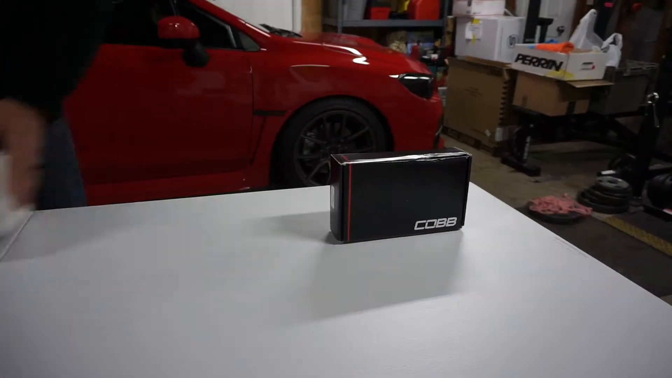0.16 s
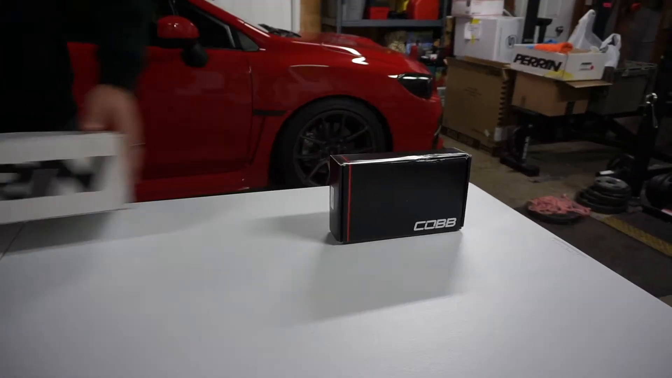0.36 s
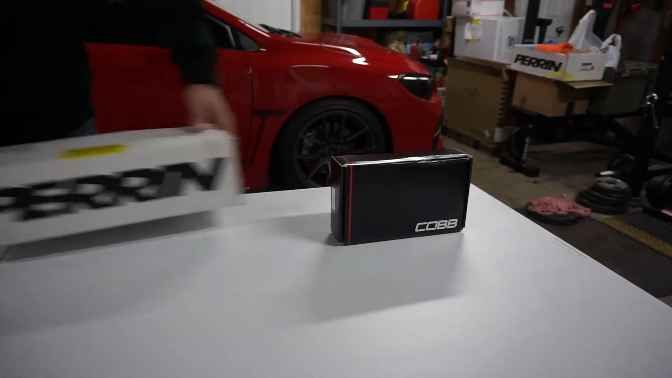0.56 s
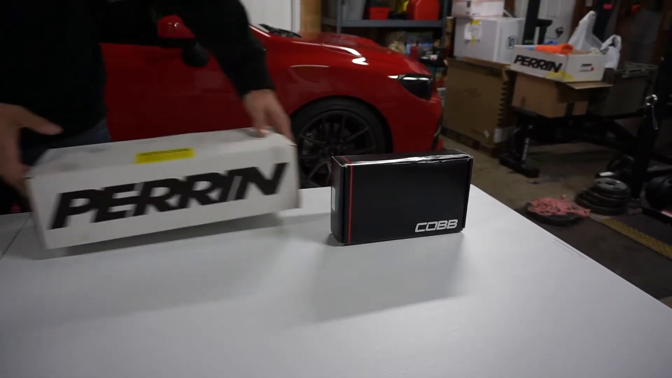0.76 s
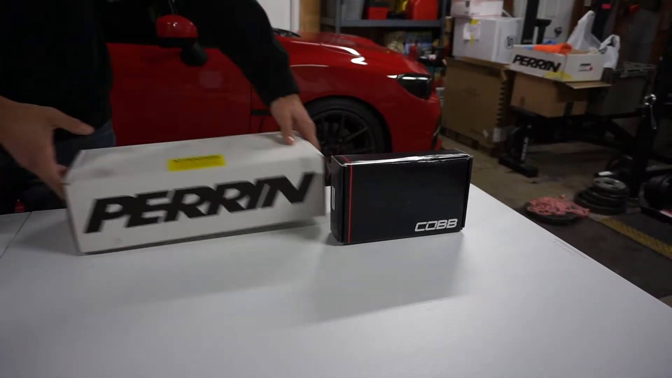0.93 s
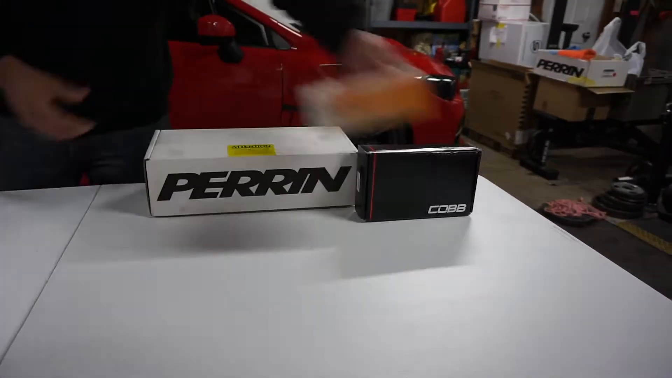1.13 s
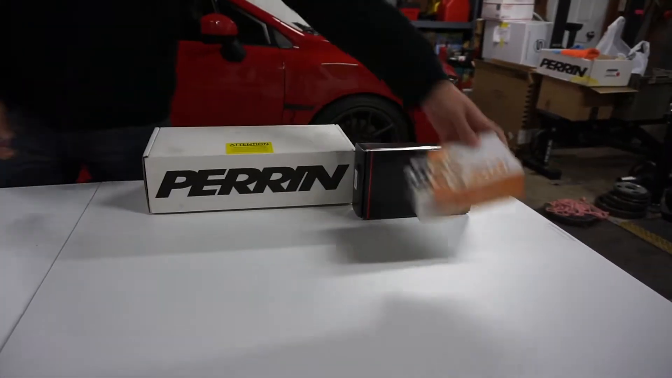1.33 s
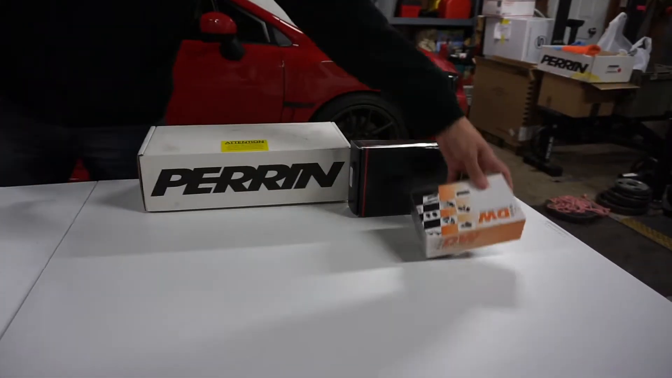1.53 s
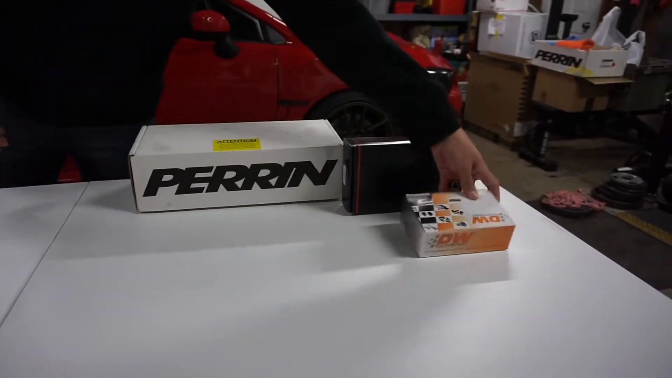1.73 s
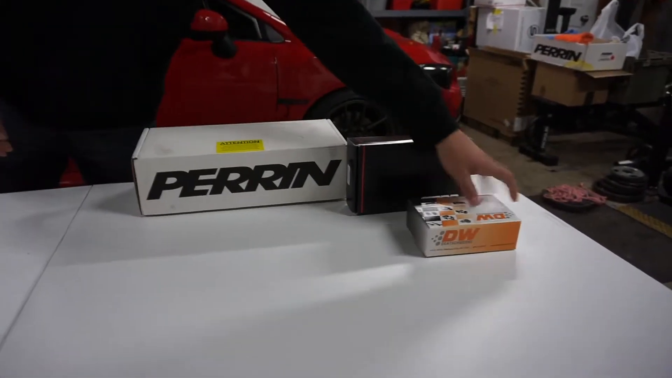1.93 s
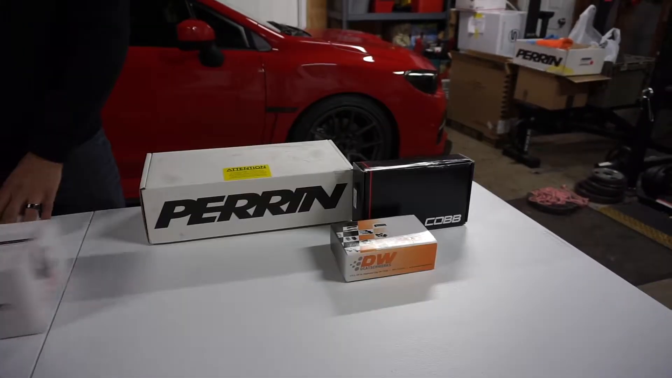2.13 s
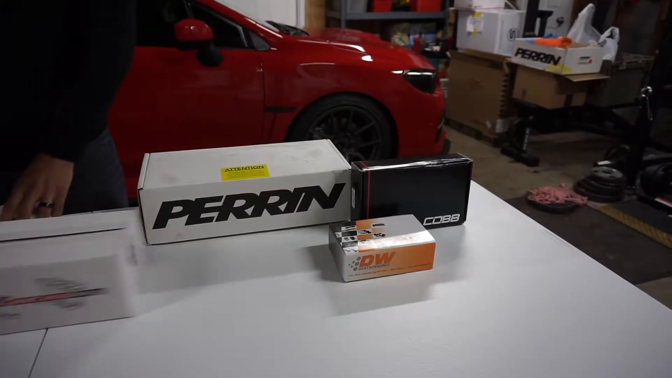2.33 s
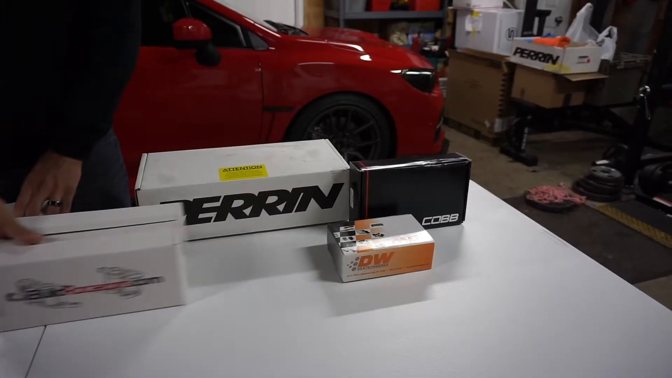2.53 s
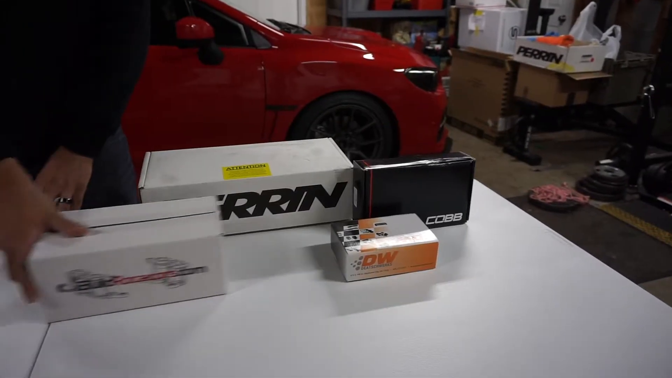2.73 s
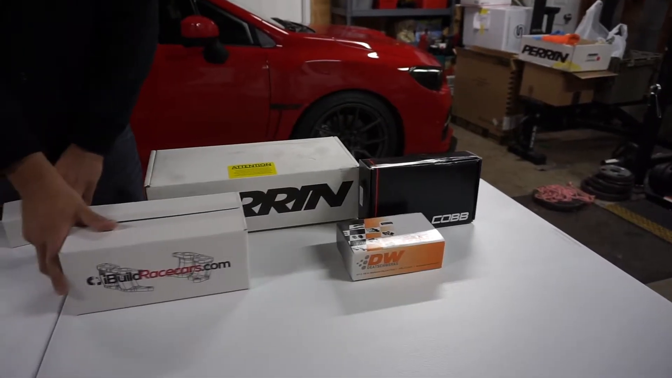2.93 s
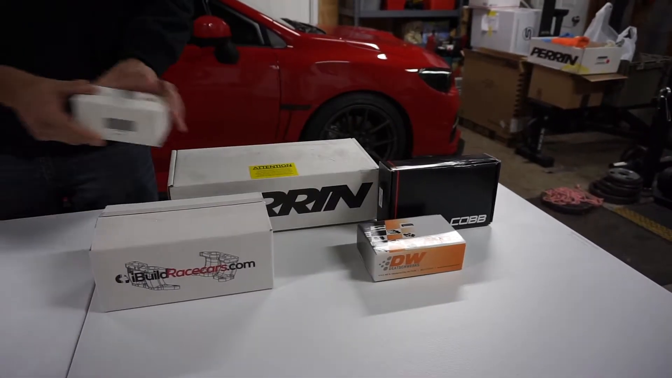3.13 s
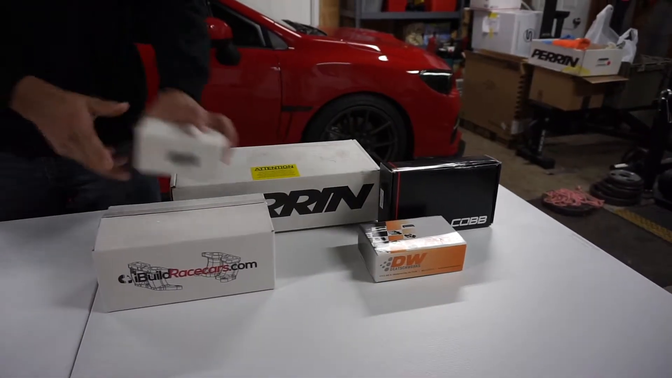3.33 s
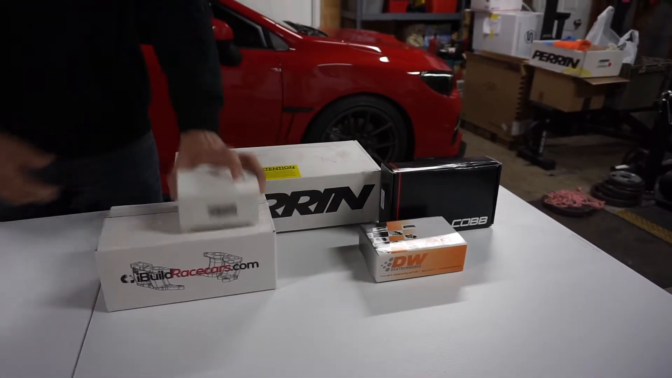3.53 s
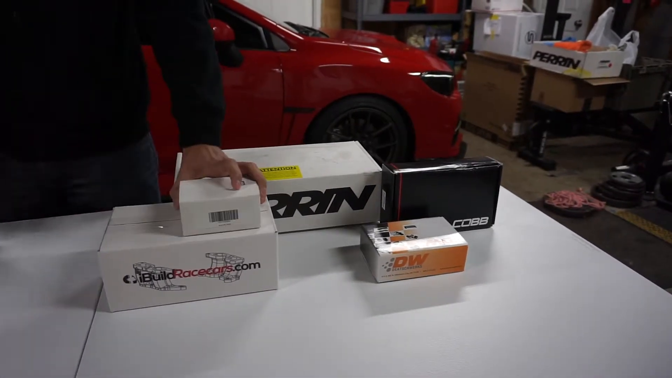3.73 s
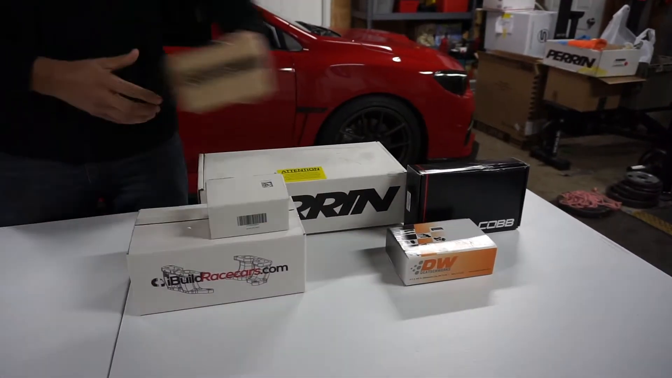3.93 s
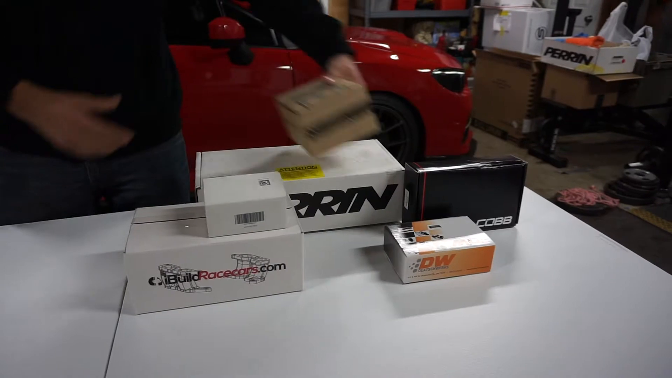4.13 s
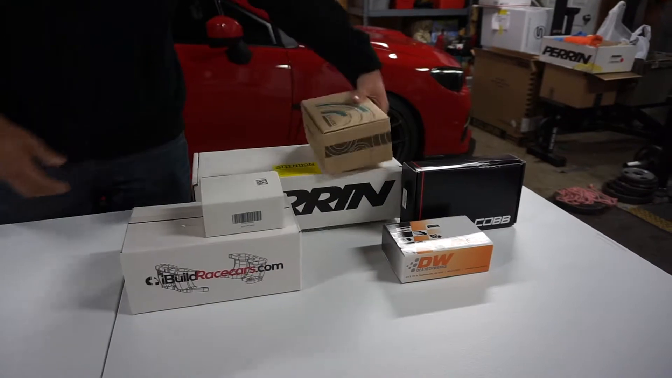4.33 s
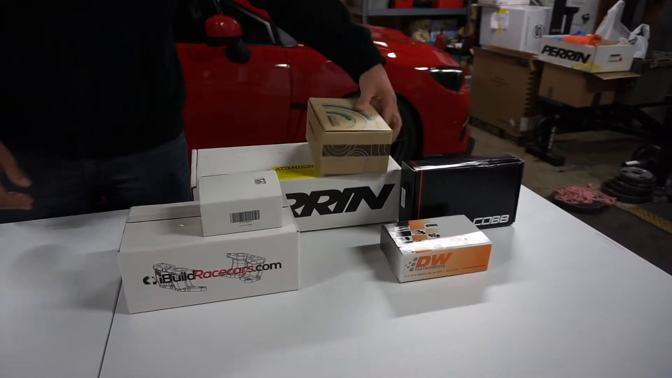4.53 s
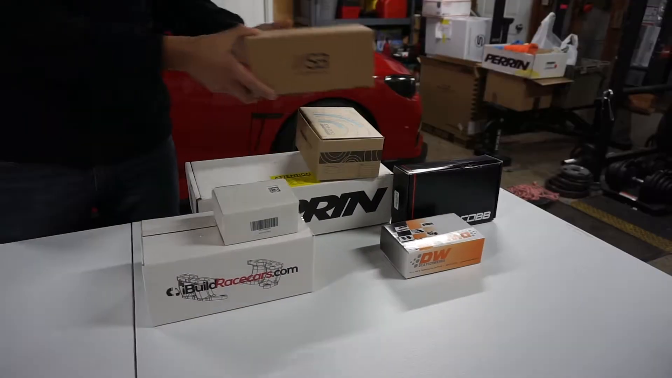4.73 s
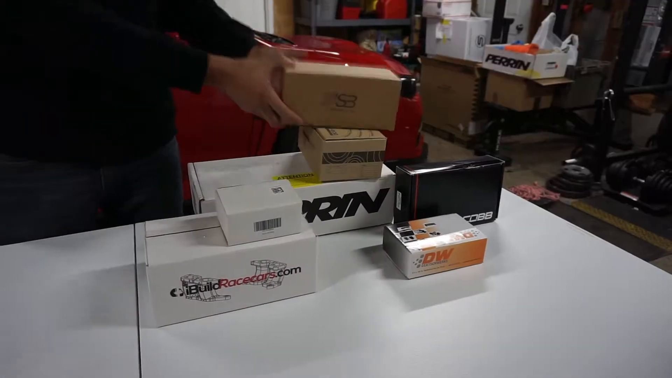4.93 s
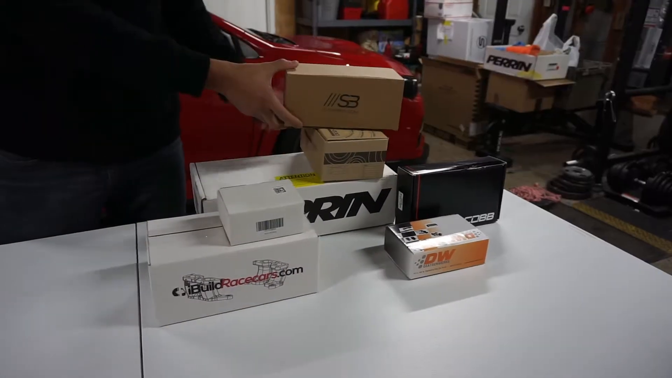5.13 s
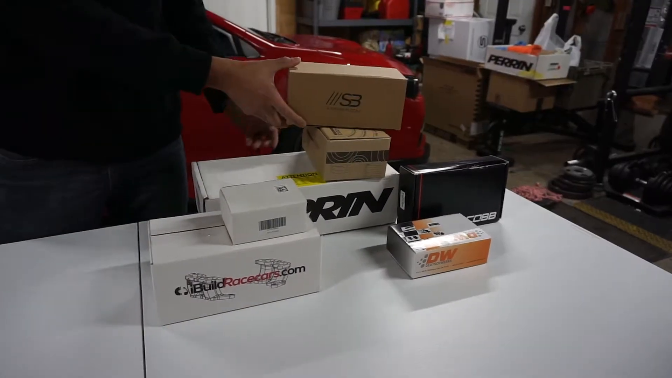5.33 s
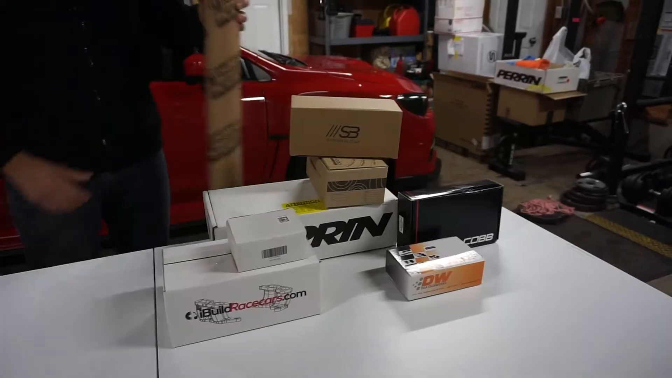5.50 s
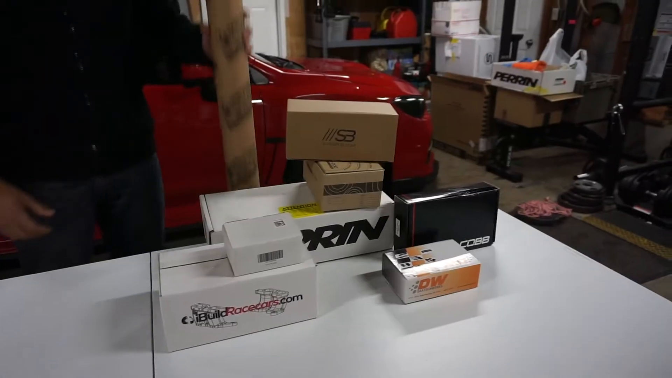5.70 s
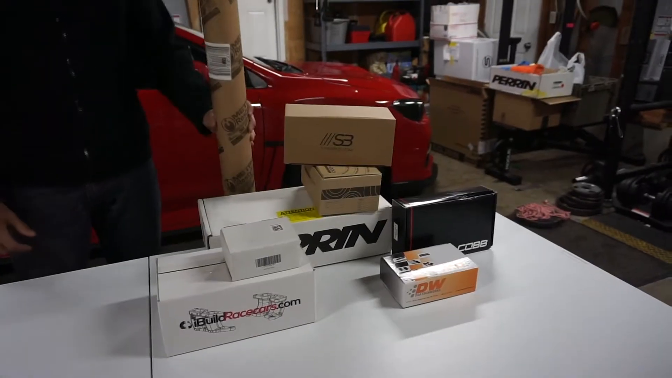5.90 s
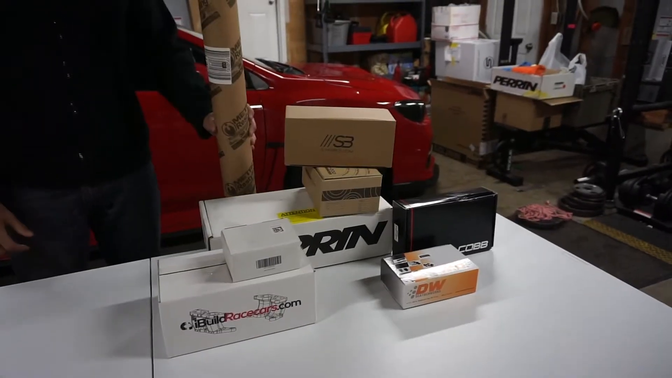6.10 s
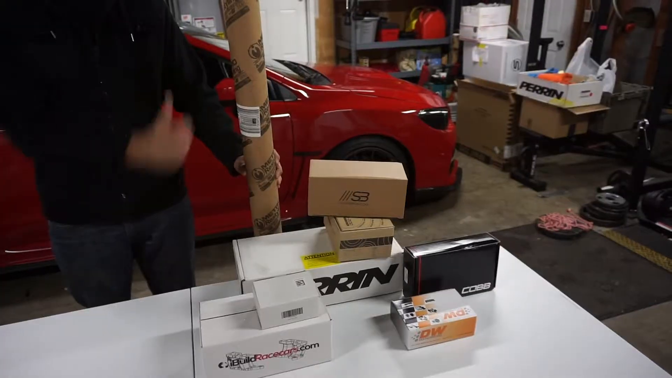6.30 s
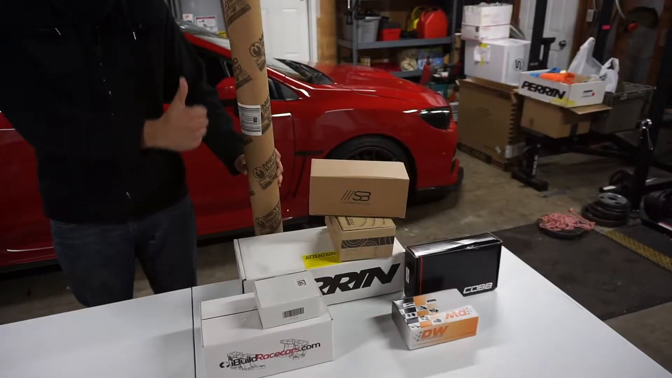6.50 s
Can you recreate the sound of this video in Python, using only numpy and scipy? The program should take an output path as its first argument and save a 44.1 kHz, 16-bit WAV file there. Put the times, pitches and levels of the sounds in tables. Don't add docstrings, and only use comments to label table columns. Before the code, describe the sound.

Close stereo pickup of boxes landing on a resonant table, each a woody thump and crisp card crack with brief room echo. Midway comes a rough half-second scrape with a falling shudder, ending in a bang. Light rustles and finger ticks separate further landings; a clustered stack knock and a hollow tube thud close it. Background hum and hiss jump at each cut.

```python
import sys
import numpy as np
from scipy import signal
from scipy.fft import rfft, irfft, next_fast_len
from scipy.io import wavfile

SR = 44100
rng = np.random.default_rng(int(sys.argv[2]) if len(sys.argv) > 2 else 0)


def generate_wav(signal):
    frames = np.transpose(np.atleast_2d(signal))
    scaled = np.clip(frames, -1, 1) * 32767
    pcm = np.round(scaled).astype(np.int16)
    wavfile.write(sys.argv[1], SR, pcm)


def to_linear_factor(level_db):
    exponent = np.asarray(level_db, float) / 20
    return 10 ** exponent


N = 289204
RUN_IN = SR // 4
TOP_HZ = 11400


# [f/Hz, level/dB, t60/s]
EDGE_MODES = [(943, -2, 0.0086), (2110, -0.5, 0.008), (2800, -14, 0.0046), (4750, -19, 0.015)]
# [f/Hz, level/dB per Hz]
CRACK_SPECTRUM = [(800, 3.5), (1300, -4.5), (2000, -4.5), (2900, -9), (3600, -18), (5000, -19),
                  (11500, -21.5)]


def blow(body, body_db, thump_s, peak_db, thump_db, thump_hz, box_hz, crack_db):
    t = np.arange(SR // 4) / SR
    thump = mode(t, thump_hz, thump_s, rise_s=0.00088)
    thump += 0.2 * mode(t, 1.36 * thump_hz, 0.35 * thump_s, rise_s=0.0073)
    box = mode(t, box_hz, t60=0.044, rise_s=0.001)
    box += 0.5 * mode(t, 1.46 * box_hz, t60=0.024, rise_s=0.0011)
    carried = [(hz, db + thump_db * (hz < 250), t60) for hz, db, t60 in body]
    under = struck(t, carried, spread_db=5.5, rise_s=0.0027)
    crack = struck(t, EDGE_MODES, spread_db=8.0, rise_s=0.0031)
    crack = crack + 0.5 * coloured(rng.standard_normal(len(t)), CRACK_SPECTRUM) * np.exp(-t / 0.0037)
    low = to_linear_factor(thump_db + 3.5) * thump + to_linear_factor(-3) * box
    return to_linear_factor(peak_db) * (low + to_linear_factor(body_db - 7.5) * under + to_linear_factor(crack_db + 8.0) * crack)


# [t/s, peak level/dB, thump against peak/dB, thump f/Hz, box f/Hz]
EDGE_LANDINGS = [(0.002, -21, -4.5, 200, 320), (0.087, -12, -26, 237, 510), (0.224, -34, -20, 116, 530),
                 (0.611, -30, -29, 186, 892), (1.017, -22, -10, 205, 355), (1.317, -39, -23, 103, 440),
                 (1.755, -12, -9.5, 365, 582), (2.793, -10, -6.5, 150, 321),
                 (2.827, -22.5, 6.5, 140.3, 337), (4.3029, -24.5, -3, 281, 327),
                 (4.381, -23.5, -5, 231, 285), (4.454, -19, -37, 291, 430), (4.539, -17, -11, 158, 383),
                 (4.554, -19, -13, 223, 604), (4.98, -14, -9, 190, 453), (4.99, -16.5, -4, 188, 332),
                 (5.016, -21.5, 7, 135, 318), (5.906, -12.5, -9.5, 179, 297), (5.924, -20, -9, 318, 320),
                 (5.954, -21, -1, 288, 350), (5.984, -25, -4, 288, 330)]
FLAT_LANDINGS = [(0.02, -14.5, -10.5, 129, 585), (0.132, -19, -38, 274, 570), (0.15, -24, -24, 91.5, 526),
                 (0.617, -29.5, -17, 91.5, 584), (0.981, -25, 0.5, 170, 312),
                 (0.992, -22.5, -0.5, 186, 610), (1.601, -15, -2.5, 155, 405), (1.64, -29.5, 0, 205, 422),
                 (1.828, -17, -8.5, 139, 340), (1.868, -29, -18, 146, 468), (2.807, -13, -15, 143, 532),
                 (3.587, -10, -12, 251, 265), (3.623, -11, -8.5, 176, 541), (3.678, -31, 0, 246, 320),
                 (4.63, -19.5, -6.5, 143, 542), (4.967, -21, -14, 102, 665), (5.004, -19.5, -22, 189, 1210),
                 (5.069, -20, -18, 146, 580), (5.092, -27.5, 5.5, 143, 426)]
FLAT_CRACK_DB = -21.5
# [f/Hz, level/dB, t60/s]
TABLE_MODES = [(58, -16, 0.11), (135, -5.5, 0.28), (212.7, 2, 0.2), (281.7, -14, 0.35), (373.8, -11, 0.2),
               (481, -8, 0.079), (635, -13, 0.12), (939, -10, 0.063), (1323, -25, 0.084)]
# [f/Hz, level/dB, t60/s]
TUBE_MODES = [(102, -2, 0.37), (205, -4, 0.49), (288, -3, 0.35), (330, -12, 0.37), (376, -5, 0.4),
              (780, 7.5, 0.041), (1270, -2, 0.1)]
TUBE_FROM_S, TUBE_DB = 5.9, 3


def landings(t, start, stop, table_db, thump_s, edge_db):
    out = np.zeros(len(t))
    blows = [(*b, edge_db) for b in EDGE_LANDINGS] + [(*b, FLAT_CRACK_DB) for b in FLAT_LANDINGS]
    for s, *row in blows:
        if start <= s < stop:
            body, body_db = (TUBE_MODES, TUBE_DB) if s > TUBE_FROM_S else (TABLE_MODES, table_db)
            add_at(out, t, s, -blow(body, body_db, thump_s, *row))
    return out


# [f/Hz, level/dB per Hz]
CARD_SPECTRUM = [(60, -37), (110, -10), (300, -4.5), (420, -7), (550, -4.5), (700, -10.5), (950, -10),
                 (1100, -13.5), (1300, -13), (1700, -19), (2400, -30.5), (4800, -88)]
# [f/Hz, level/dB per Hz]
RUMBLE_SPECTRUM = [(25, -15), (45, -3.5), (70, -1), (120, -3.5), (200, -6.5), (400, -42.5)]
# [f/Hz, level/dB per Hz]
GRIT_SPECTRUM = [(1200, -28), (2000, -7), (2400, -4.5), (2750, -6), (3050, -8), (3500, -10.5),
                 (4500, -14.5), (6000, -27)]
# [f/Hz, level/dB per Hz]
HISS_SPECTRUM = [(2060, -37), (3500, -10.5), (6490, 0), (9580, 2), (10600, 5), (11200, 6.5), (14600, -48),
                 (22000, -120)]


def rubbing(t, levels, lowest_hz):
    rumble_db, card_db, grit_db, hiss_db = levels
    grains = uneven_grains((2, len(t)), 2.47)
    card = high_pass(coloured(grains[0], CARD_SPECTRUM), lowest_hz)
    card *= to_linear_factor(card_db - 4.0 + 1.88 * drift(43, len(t)))
    rumble = to_linear_factor(rumble_db - 5.0) * coloured(grains[0], RUMBLE_SPECTRUM)
    grit = to_linear_factor(grit_db - 2 + 1.05 * drift(39, len(t))) * coloured(grains[1], GRIT_SPECTRUM)
    hiss = to_linear_factor(hiss_db + 0.5 + 0.54 * drift(36, len(t))) * coloured(grains[1], HISS_SPECTRUM)
    return rumble + card + grit + hiss


# [t/s, card level/dB, hold/s, card fall/dB per s, grit against card/dB]
SETTLING = [(0, -37.5, 0.12, 290, -14.5), (0.637, -55, 0.022, 600, -15), (0.984, -39.5, 0.043, 106, -7),
            (1.593, -44.5, 0.039, 90, -16), (1.755, -24.5, 0.042, 126, -13.5),
            (2.787, -24, 0.0083, 128, -9.5), (3.214, -47.5, .03, 16, -8), (3.583, -27.5, 0.008, 98, -19),
            (3.78, -48.5, 0.11, 297, -25), (4.299, -46.5, 0.14, 66, -11.5), (4.434, -39.5, 0.06, 100, -11),
            (4.534, -34.5, .01, 77, -12.5), (4.977, -25, 0.046, 108, -15), (5.477, -62, .03, 38, -17),
            (5.904, -22, 0.11, 97, -11.5)]
SETTLE_RISE_S, GRIT_FALL_DB_PER_S, HISS_FALL_DB_PER_S = 0.0014, 117, 151
RUMBLE_DB, RUMBLE_FOLLOWS = -38.5, 0.39
RUMBLE_RISE_S, RUMBLE_FALL_DB_PER_S = 0.03, 52
# [t/s, pressure as card level/dB, grittiness/dB, drag on the table legs/dB]
SLIDE_PATH = [
    (2.075, -27, -8.5, -51),
    (2.177, -29.5, -5.5, -35),
    (2.323, -30.5, -14.5, -42.5),
    (2.381, -31.5, -8.5, -30),
    (2.485, -35.5, -7.5, -36),
    (2.785, -39, -5.5, -34.5),
]
SLIDE_GRIT_DB, SLIDE_GRIT_FOLLOWS = 0.3, 1.27


def rub_levels(t, start, stop, handling, hiss_db, table_db):
    power = to_linear_factor(2 * np.array(handling))[:, None] * np.ones(len(t))
    for s, card_db, hold_s, fall, grit_db in SETTLING:
        if start <= s < stop:
            age, late = np.maximum(t - s, 0), np.maximum(t - s - hold_s, 0)
            rise = 1 - np.exp(-age / SETTLE_RISE_S)
            swell = 1 - np.exp(-age / RUMBLE_RISE_S)
            rumble_db = RUMBLE_DB + RUMBLE_FOLLOWS * (card_db + table_db + 38.5)
            power[0] += (swell * to_linear_factor(rumble_db - RUMBLE_FALL_DB_PER_S * late)) ** 2
            power[1] += (rise * to_linear_factor(card_db - fall * late)) ** 2
            power[2] += (rise * to_linear_factor(card_db + grit_db - GRIT_FALL_DB_PER_S * late)) ** 2
            power[3] += (rise * to_linear_factor(card_db + hiss_db - HISS_FALL_DB_PER_S * age)) ** 2
    if start <= SLIDE_PATH[0][0] < stop:
        pressure, gritty, drag = in_time(SLIDE_PATH, t)
        grit = pressure + SLIDE_GRIT_DB + SLIDE_GRIT_FOLLOWS * gritty
        slide = np.array([drag, pressure, grit, pressure + gritty])
        power += to_linear_factor(2 * slide) * (t < SLIDE_PATH[-1][0])
    return 10 * np.log10(power)


# [t/s, f/Hz, level/dB, second partial level/dB]
STICK_SLIP = [
    (2.19, 114, -38, -44),
    (2.225, 110.8, -25, -37),
    (2.3, 97.6, -28, -36.5),
    (2.33, 93.2, -29, -40),
    (2.36, 85.6, -30.5, -28),
    (2.41, 76.5, -29, -34),
    (2.435, 72.5, -40, -29.5),
    (2.49, 62.7, -55, -37),
    (2.52, 60.6, -59, -42),
]


def judder(t):
    hz, first_db, second_db = in_time(STICK_SLIP, t)
    turn = phase(hz * (1 + 0.025 * drift(23, len(t))))
    on = np.clip(np.minimum(t - STICK_SLIP[0][0], STICK_SLIP[-1][0] - t) / 0.025, 0, 1)
    wave = to_linear_factor(first_db) * np.sin(turn)
    wave += to_linear_factor(second_db) * (np.sin(2 * turn + 1.6) + 0.14 * np.sin(3 * turn))
    return np.sqrt(2) * on * to_linear_factor(0.5 + 0.81 * drift(34, len(t))) * wave


# [t/s, f/Hz, level/dB]
HOLLOW_PATH = [
    (2.07, 2495, -60),
    (2.18, 2016, -46),
    (2.32, 2510, -58),
    (2.385, 2452, -42),
    (2.45, 2610, -55),
    (2.51, 2700, -46.5),
    (2.62, 2840, -51),
    (2.78, 2700, -57),
]


def hollow(t):
    hz, db = in_time(HOLLOW_PATH, t)
    narrow = signal.butter(2, 260, fs=SR, output="sos")
    a, b = signal.sosfilt(narrow, uneven_grains((2, len(t)), 2.7))
    turn = phase(hz)
    on = (t > HOLLOW_PATH[0][0]) * (t < HOLLOW_PATH[-1][0])
    return on * to_linear_factor(db + 4.1 * drift(26, len(t))) * rms_one(a * np.cos(turn) + b * np.sin(turn))


# [t/s, peak level/dB, f/Hz, t60/s, left-right/dB]
PANEL_RINGS = [(0.611, -43, 607, .05, 2), (1.574, -48, 2400, .012, -5), (1.574, -46, 1100, .015, -3),
               (1.6, -34.5, 3030, 0.023, -8), (1.6, -42, 4570, .02, -5), (1.603, -38, 2300, .02, -9),
               (1.745, -40, 2800, .015, -5), (1.755, -8.5, 2800, 0.011, -11),
               (1.755, -19.5, 4000, 0.012, -4), (1.756, -14, 950, 0.024, -4), (1.755, -32, 7500, .012, -13),
               (1.755, -32, 9500, .012, -6), (1.826, -36, 9500, .02, -6), (2.793, -21, 2940, 0.017, -1),
               (3.154, -42, 9600, .015, 7), (3.161, -37, 870, .02, 3), (3.218, -35, 8890, .015, 7),
               (3.231, -32, 8900, .015, 7), (3.588, -19.5, 489, .07, 2), (3.588, -25, 1030, .06, 3),
               (3.589, -28, 830, 0.079, 0), (3.59, -31, 1300, .06, 3), (3.623, -19, 363, 0.11, -1),
               (3.623, -39, 2030, .02, 0), (3.624, -35, 1210, .04, 0), (4.946, -41, 1540, .03, -2),
               (4.953, -36, 1450, .03, -2), (4.96, -23, 1370, .03, -4), (4.981, -16.5, 3040, 0.012, -4),
               (4.992, -21, 2800, .015, 0), (5.004, -37, 3870, .02, 0), (5.438, -49, 1120, .07, -9),
               (5.497, -48, 1144, .07, -4), (6.21, -54, 1140, .09, -2), (6.38, -49, 2110, .025, 0),
               (6.381, -50, 1300, .015, 0), (6.433, -51, 1150, .04, -6), (6.47, -41, 2900, 0.011, 0),
               (6.47, -44, 1550, .015, 0),
               (0.02, -41, 603, 0.033, 0), (0.087, -30, 495, .05, 2), (0.087, -42, 2800, 0.011, 0),
              (0.132, -38, 592, 0.044, 0), (0.15, -34, 540, .04, 0), (0.185, -34, 570, .04, 0),
              (0.205, -34, 530, .04, 0), (0.372, -42, 380, .03, 0), (0.443, -44, 198, .05, 0),
              (0.565, -49, 450, .03, 0), (0.007, -36, 2300, 0.017, 0), (4.31, -30, 75.6, 0.28, -2),
              (4.532, -33, 4220, .015, -6), (4.64, -31, 150, 0.11, -1), (0.611, -43, 3140, .012, 6),
              (0.992, -41, 2460, 0.012, 2), (1.316, -46, 2500, .01, -4), (4.453, -31, 1820, 0.022, -4),
              (5.915, -21, 780, 0.046, 2), (5.925, -16, 325, 0.17, 0), (5.97, -23, 296, 0.17, 1),
              (6.04, -26, 330, 0.27, 2)]


def flaps(t, start, stop):
    out = np.zeros((2, len(t)))
    age = np.arange(SR // 8) / SR
    for s, peak_db, hz, t60, pan_db in PANEL_RINGS:
        if start <= s < stop:
            ring = mode(age, hz, max(t60, .003), rise_s=0.0011)
            add_at(out, t, s, to_linear_factor(peak_db) * ring * pan(pan_db))
    return out


# [t/s, peak level/dB, f/Hz, left-right/dB, click share/dB]
SMALL_TICKS = [(0.064, -39, 1340, -5, -1), (0.611, -33, 2160, 7, -29), (0.8102, -43.5, 1080, 8, 0.5),
               (1.0394, -31.5, 2520, 0.0, -5), (1.4433, -40.5, 2400, -8, -11.5),
               (1.475, -42.5, 2350, -11, -8), (1.8416, -33, 1550, -15, -9), (3.051, -42.5, 1040, 17, 6),
               (3.3022, -39, 5000, 12, 8), (3.3224, -40, 9400, 20, 7), (3.9037, -46.5, 3400, 12, 0),
               (4.4527, -28, 1210, -9, -9.5), (4.532, -30, 2200, -9, -9), (4.558, -23, 2170, -9, -23),
               (5.9038, -25, 1270, 0, -20), (6.4699, -38.5, 1180, 0.0, -9.5)]


def ticks(t, start, stop):
    out = np.zeros((2, len(t)))
    age = np.arange(SR // 20) / SR
    for s, peak_db, hz, pan_db, click_db in SMALL_TICKS:
        if start <= s < stop:
            ring = mode(age, min(hz, TOP_HZ), t60=0.013, rise_s=0.00019)
            click = np.diff(burst(age, 0.0036) + 1.6 * burst(age, 0.00034), prepend=0)
            add_at(out, t, s, to_linear_factor(peak_db - 2) * (ring + to_linear_factor(click_db) * click) * pan(pan_db))
    return out


# [t/s, length/s, level/dB, lowest f/Hz]
SLEEVE_RUSTLES = [(0.05, 0.071, -46.5, 2500), (1.574, 0.054, -51, 5000), (1.698, 0.072, -50, 6000),
                  (3.178, 0.073, -40, 6500), (3.197, 0.045, -46, 2000), (3.261, 0.096, -41, 2980),
                  (3.835, 0.05, -51, 4500), (3.89, 0.065, -49, 2500), (4.353, 0.15, -46, 2500),
                  (4.506, 0.059, -39.5, 2000), (4.993, 0.027, -38, 2500), (5.835, 0.18, -46.5, 4000)]


def rustle(t):
    out, white = np.zeros(len(t)), rms_one(uneven_grains(len(t), 3.4))
    for s, length_s, db, lowest_hz in SLEEVE_RUSTLES:
        if t[0] < s < t[-1]:
            swell = np.sin(np.pi * np.clip((t - s) / length_s, 0, 1)) ** 2
            out += to_linear_factor(db) * swell * high_pass(white, lowest_hz)
    return out


# [t/s, f/Hz, level/dB]
TUBE_SQUEAK = [
    (5.515, 1180, -80),
    (5.53, 1253, -59),
    (5.545, 1450, -62),
    (5.59, 1410, -67),
    (5.61, 1420, -78),
]


def squeak(t):
    hz, db = in_time(TUBE_SQUEAK, t)
    turn = phase(hz * (1 + .015 * drift(40, len(t))))
    on = (t > TUBE_SQUEAK[0][0]) * (t < TUBE_SQUEAK[-1][0])
    return on * to_linear_factor(db + 3.0 * drift(50, len(t))) * (np.sin(turn) + .15 * np.sin(2 * turn))


def take(start, stop, side, garage_db, box, handling, echo):
    table_db, lowest_hz, thump_s, edge_db, hiss_db = box
    first, last = round(start * SR) - RUN_IN, round(stop * SR)
    t = np.arange(first, first + next_fast_len(last - first + SR)) / SR
    rubs = rub_levels(t, start, stop, handling, hiss_db, table_db)
    dry = (rubbing(t, rubs, lowest_hz) + rustle(t) * (t > start)) * (t < stop)
    dry += landings(t, start, stop, table_db, thump_s, edge_db) + squeak(t) + hollow(t)
    snaps = ticks(t, start, stop) + flaps(t, start, stop)
    shake = judder(t)
    into_room = dry + to_linear_factor(-1.0) * shake + to_linear_factor(-2) * snaps.mean(axis=0)
    wet = to_linear_factor(garage_db) * rfft(echo, len(t)) * rfft(into_room)
    direct = rfft(dry + shake) * ports(len(t), side)
    heard = irfft((direct + wet) * port_cavity(len(t)), len(t)) + snaps
    return top_cut(high_pass(heard[:, :last - first], 42., order=3))[:, RUN_IN:]


def ports(size, side):
    hz, lean = np.arange(size // 2 + 1) * SR / size, np.array([[side / 2], [-side / 2]])
    return to_linear_factor(lean * 20.4 * hz / (hz + 2500)) * np.exp(2j * np.pi * hz * lean * .00009)


PORT_HZ, PORT_WIDTH_HZ, PORT_DB = 2640, 1000, 0.5


def port_cavity(size):
    f = np.arange(size // 2 + 1) * SR / size
    return 1 + (to_linear_factor(PORT_DB) - 1) / (1 + 1j * (f ** 2 - PORT_HZ ** 2) / (PORT_WIDTH_HZ * f + 1))


def top_cut(x):
    return signal.sosfilt(signal.cheby2(14, 40, TOP_HZ, fs=SR, output="sos"), x)


# [f/Hz, t60/s, level/dB]
GARAGE_DECAY = [(50, 0.3, 4), (150, 0.55, -6), (427, 0.58, 0.5), (1100, 0.5, 0), (2750, 0.54, 3),
                (7500, 0.46, 4)]


def garage():
    t = np.arange(SR) / SR
    echo = np.zeros((2, SR))
    for hz, band in diffuse_bands(SR):
        echo += band * to_linear_factor(at_hz(GARAGE_DECAY, hz, column=2) - 60 * t / at_hz(GARAGE_DECAY, hz))
    echo = echo * (1 - np.exp(-np.maximum(t - .004, 0) / 0.0012))
    return echo / np.sqrt(np.sum(echo ** 2) / 2)


# [f/Hz, level/dB per Hz]
DRONE_SPECTRUM = [(13, -36), (22, -10), (64, -15.5), (102, 1.5), (173, -28), (192, -8.5), (331, -18.5),
                  (368, -18.5), (688, -24.5), (763, -25.5), (1040, -29.5), (1460, -25.5), (1670, -41.5),
                  (1950, -30.5), (11200, -39.5), (14600, -78), (22000, -120)]
# [f/Hz, level/dB per Hz]
MURMUR_SPECTRUM = [(600, -16), (800, -2.5), (900, 2), (1050, -12.5), (1150, -0.5), (1250, -21), (1600, -31)]


def drone():
    layers = np.zeros((4, 2, N))
    for hz, band in diffuse_bands(N):
        part = int(hz > 400) + int(hz > 2000)
        sway_db = [2.2, 1.2, .4][part] * drift(7.7, N)
        layers[part] += band * to_linear_factor(at_hz(DRONE_SPECTRUM, hz) + sway_db)
    layers = to_linear_factor(-52.0) * layers / np.sqrt(np.mean(layers.sum(axis=0) ** 2))
    mid, side = [coloured(x, MURMUR_SPECTRUM) for x in rng.standard_normal((2, N))]
    layers[3] = to_linear_factor(2 * drift(4.2, N)) * (mid + 0.86 * side * [[1], [-1]])
    return top_cut(layers)


# [f/Hz, left-right likeness/1]
PORT_LIKENESS = [(60, 1), (140, 0.97), (350, 0.87), (830, 0.41), (2000, -0.43), (4790, -0.38),
                 (11500, -0.24)]


def diffuse_bands(size):
    edges, white = 20 * 2 ** np.arange(0, 9.6, .5), rng.standard_normal((2, 2, size))
    for k, (low, high) in enumerate(zip(edges, edges[1:])):
        centre = np.sqrt(low * high)
        mid, side = signal.sosfilt(signal.butter(2, [low, high], "band", fs=SR, output="sos"), white[k % 2])
        alike = np.clip(at_hz(PORT_LIKENESS, centre), -1, .995)
        yield centre, np.sqrt(1 + alike) * mid + np.sqrt(1 - alike) * side * [[1], [-1]]


def mode(t, hz, t60, rise_s):
    return np.sin(2 * np.pi * hz * t) * to_linear_factor(-60 * t / t60) * (1 - np.exp(-t / max(rise_s, 1e-4)))


def struck(t, modes, spread_db, rise_s):
    chance = rng.normal(0, spread_db, 12)
    return sum(to_linear_factor(db + c) * mode(t, hz, t60, rise_s) for (hz, db, t60), c in zip(modes, chance))


def burst(t, length_s):
    return rng.standard_normal(len(t)) * np.exp(-t / max(length_s, 1e-4))


def uneven_grains(shape, spread_db):
    return rng.standard_normal(shape) * to_linear_factor(spread_db * np.minimum(rng.exponential(1, shape), 5))


def drift(rate, size):
    r = np.exp(-80 * np.pi * rate / SR)
    slow = signal.lfilter([1], [1, -2 * r, r * r], rng.standard_normal(size // 40 + 1002))[1000:]
    return np.interp(np.arange(size) / 40, np.arange(len(slow)), rms_one(slow))


def coloured(x, spectrum):
    hz = np.arange(len(x) // 2 + 1) * SR / len(x)
    return rms_one(irfft(rfft(x) * to_linear_factor(at_hz(spectrum, hz)), len(x)))


def high_pass(x, hz, order=2):
    return signal.sosfilt(signal.butter(order, hz, "high", fs=SR, output="sos"), x)


def phase(hz):
    return 2 * np.pi * np.cumsum(hz) / SR


def rms_one(x):
    return x / np.sqrt(np.mean(x ** 2) + 1e-20)


def pan(db):
    return to_linear_factor([[db / 2], [-db / 2]])


def add_at(out, t, s, x):
    out[..., round(s * SR) - round(t[0] * SR):][..., :x.shape[-1]] += x


def at_hz(points, hz, column=1):
    return np.interp(np.log(hz + 1e-9), np.log(np.array(points)[:, 0]), np.array(points)[:, column])


def in_time(rows, t):
    s, *columns = np.transpose(rows)
    return [np.interp(t, s, c) for c in columns]


# [start t/s, side/1 (-1 right to 1 left), garage level/dB]
TAKE_PLACES = [(0, 0, -6.5), (.234, 0.36, -3.5), (1.134, 0.16, -6.5), (2.068, 0.6, -3), (3.072, 0.4, -5),
               (3.584, 0.16, -5.5), (4.671, 0.16, -6.5), (5.902, 0.36, -6.5), (6.206, 0.27, -4)]
# [table share/dB, lowest card f/Hz, thump t60/s, edge crack against peak/dB,
# hiss against card/dB]
TAKE_BOXES = [(-7.5, 130, 0.06, -16, -25), (-2.5, 260, 0.049, -14, -9.5), (-0.5, 110, 0.058, -9, -45),
              (2, 68, 0.14, -9.5, -15), (-6, 750, .08, -15, 2.5), (-4.5, 250, 0.069, -14.5, -19.5),
              (-6.5, 72, 0.048, -6.5, -21.5), (-30, 68, 0.29, -5, -36), (4, 300, .08, -15, -20)]
# [table rumble/dB, card/dB, grit/dB, surface hiss/dB]
TAKE_HANDLING = [(-46.5, -57, -68, -73), (-58, -61.5, -68.5, -70.5), (-56, -61, -68, -66),
                 (-57, -52, -57, -71), (-68, -55, -78, -66.5), (-47.5, -66, -68.5, -71.5),
                 (-52.5, -76, -73.5, -72), (-54, -55, -72, -92), (-49.5, -79, -78, -71.5)]
# [low drone/dB, middle/dB, hiss/dB, air murmur/dB]
TAKE_BACKGROUND = [(-7, 12, 7, -83), (3, 4, 0.5, -64), (6, 7.5, 3, -62), (5, 14, 11.5, -65),
                   (4.5, 3.5, 4, -58), (0, 4, 2, -62), (1, 3.5, 1.5, -68.5), (5, 2, -8, -72),
                   (2, 2.5, 0.5, -70)]


def scene():
    echo, air = garage(), drone()
    stops = [row[0] for row in TAKE_PLACES[1:]] + [N / SR]
    takes = []
    for k, ((start, *row), stop) in enumerate(zip(TAKE_PLACES, stops)):
        near = take(start, stop, *row, TAKE_BOXES[k], TAKE_HANDLING[k], echo)
        far = air[:, :, k * (N // 12):][:, :, :near.shape[1]]
        takes.append(near + np.tensordot(to_linear_factor(np.array(TAKE_BACKGROUND[k])), far, axes=1))
    return np.concatenate(takes, axis=1)


def low_pass(x):
    return signal.sosfilt(signal.butter(12, 12110, fs=SR, output="sos"), x)


def record(dry):
    return low_pass(dry)


dry = scene()
out = record(dry)
generate_wav(out)
```